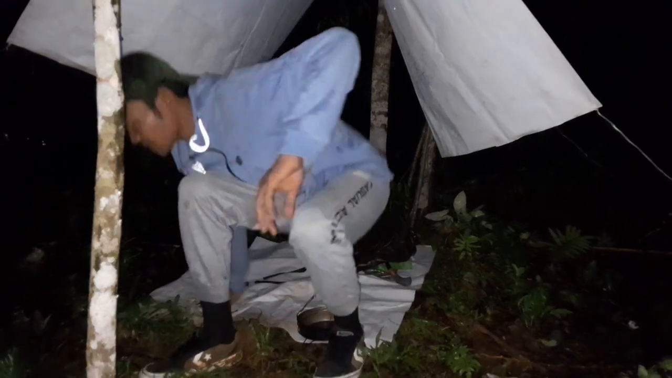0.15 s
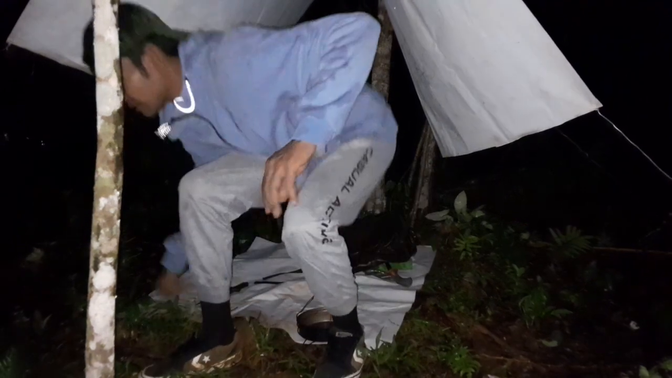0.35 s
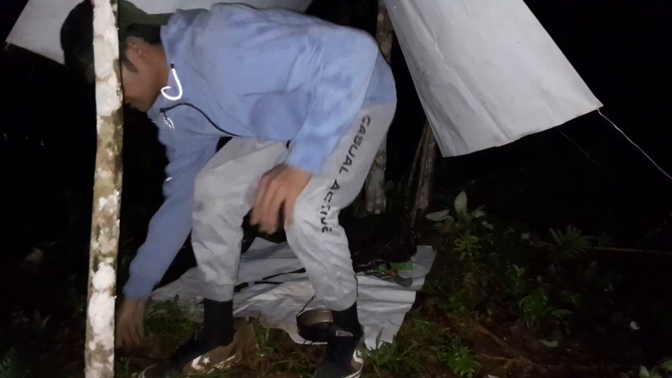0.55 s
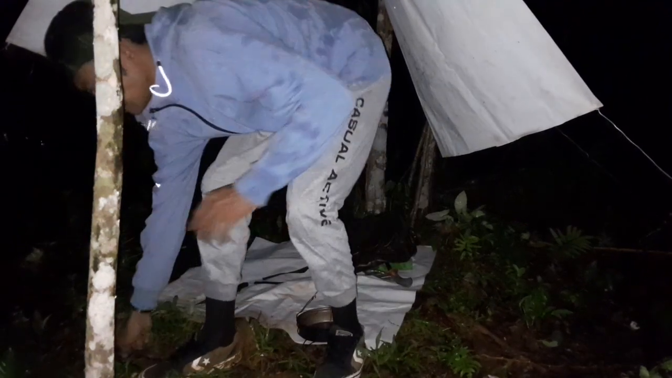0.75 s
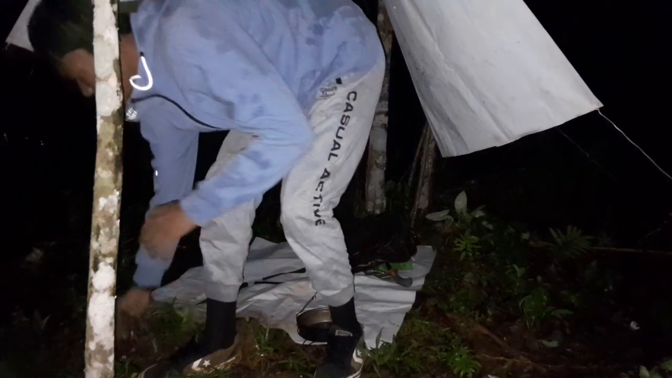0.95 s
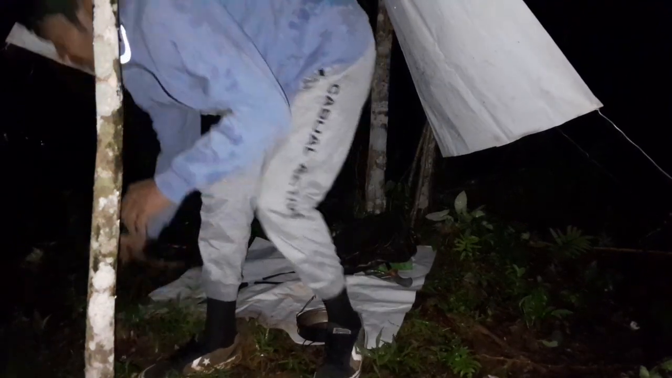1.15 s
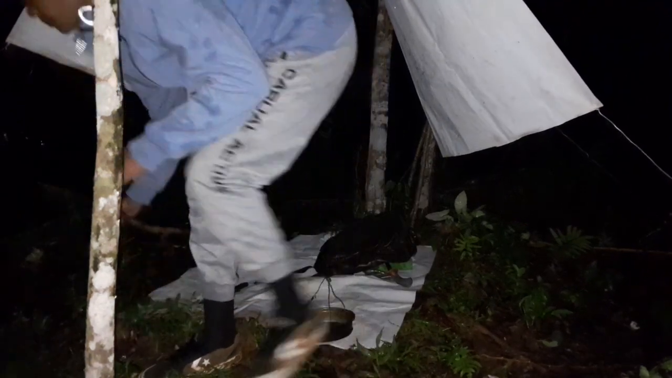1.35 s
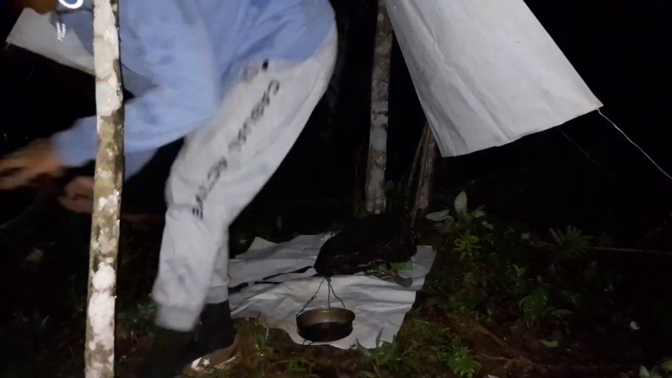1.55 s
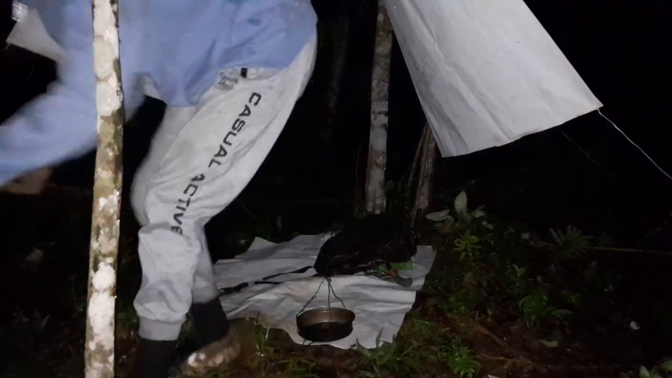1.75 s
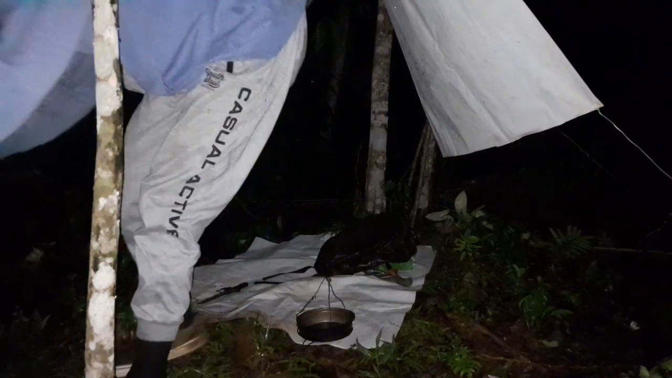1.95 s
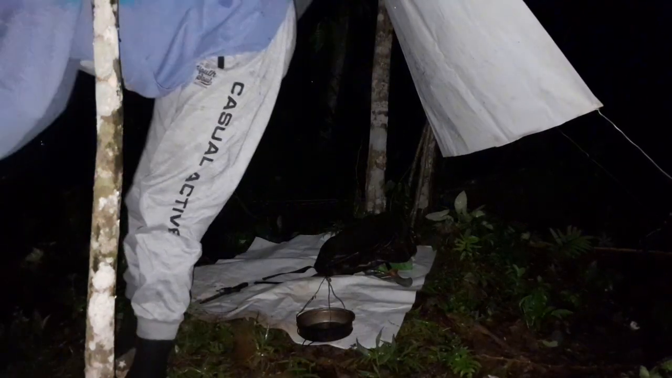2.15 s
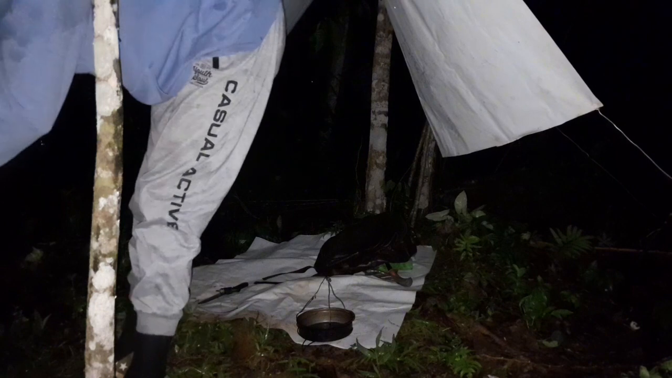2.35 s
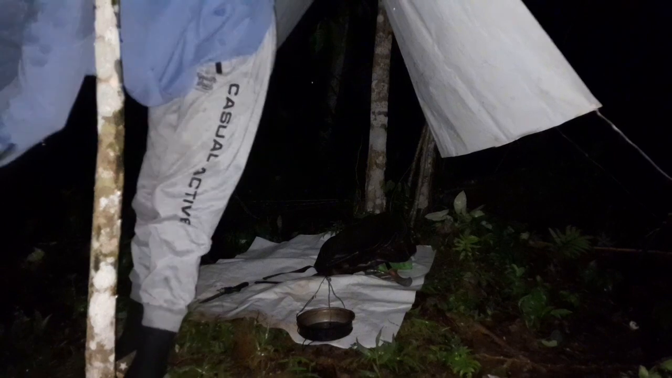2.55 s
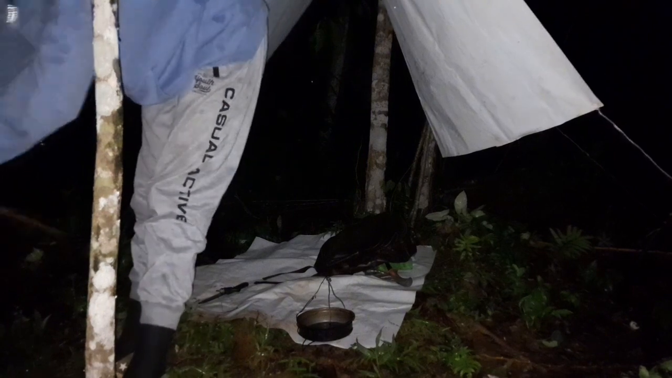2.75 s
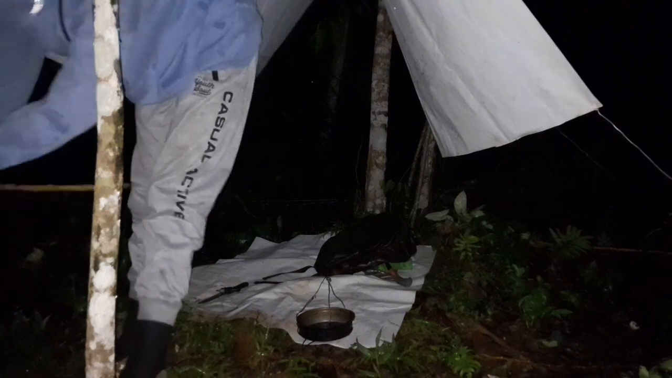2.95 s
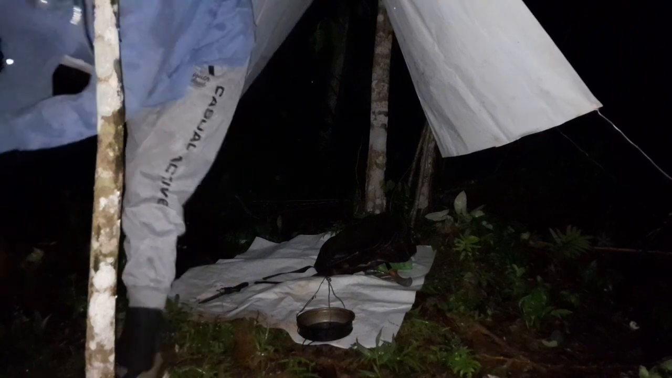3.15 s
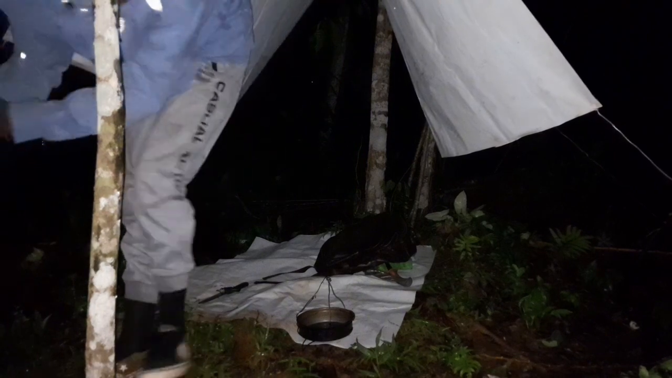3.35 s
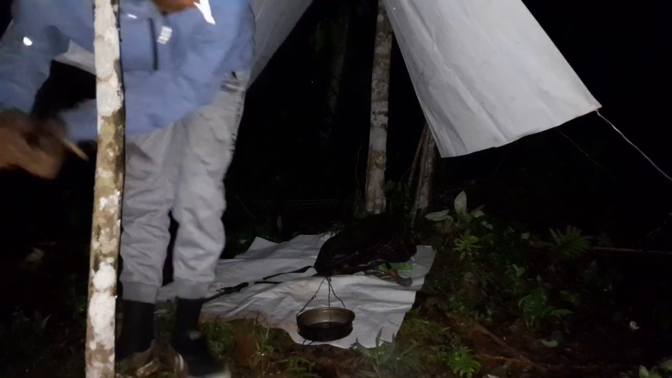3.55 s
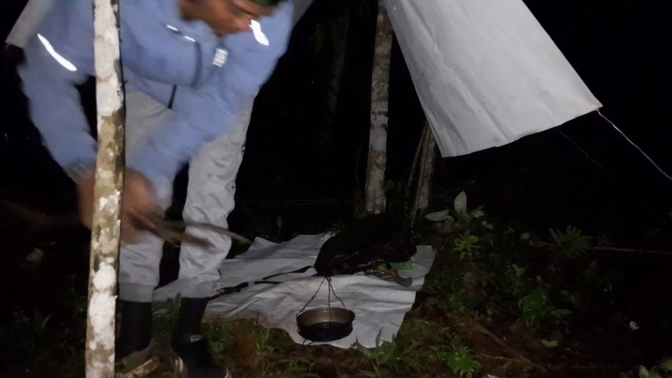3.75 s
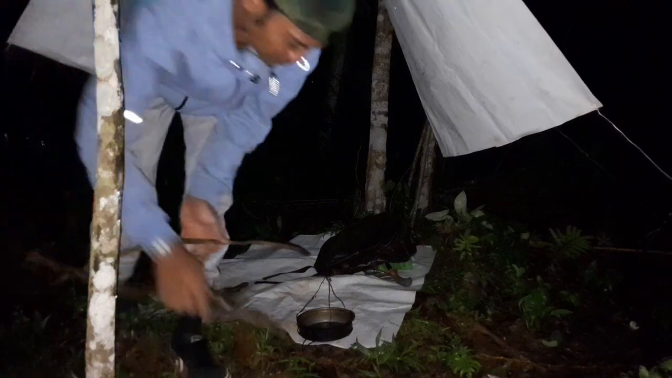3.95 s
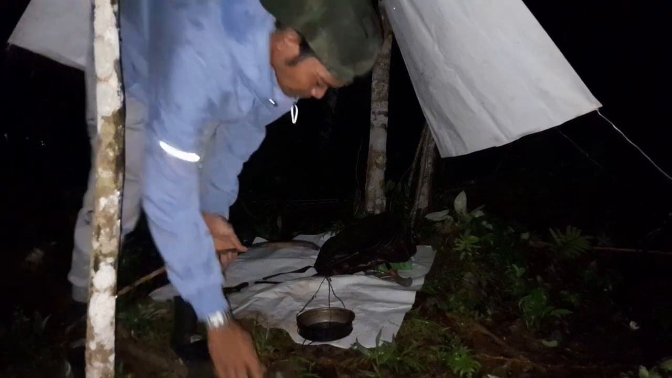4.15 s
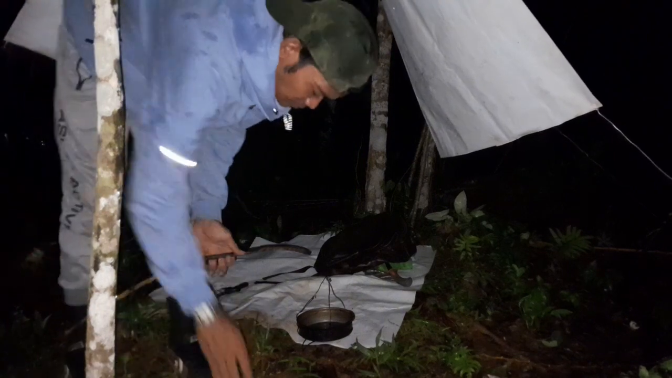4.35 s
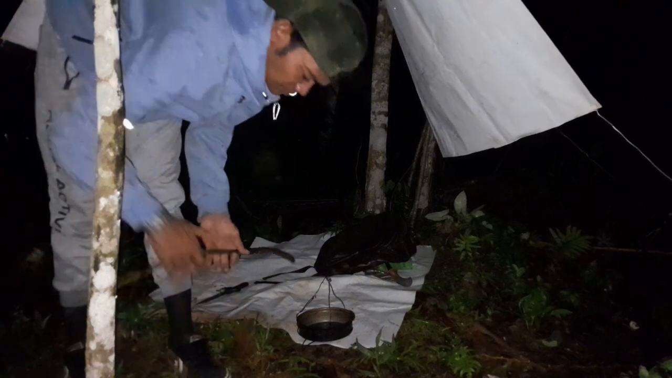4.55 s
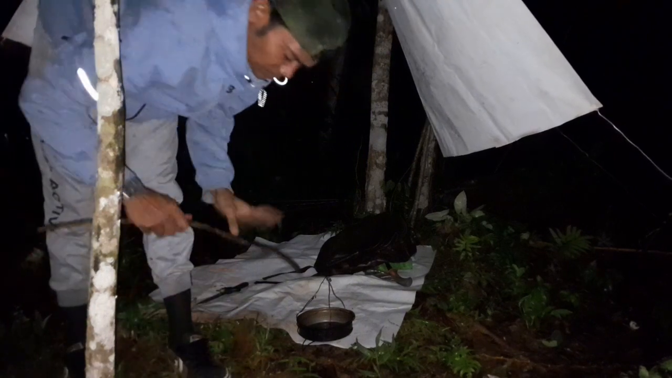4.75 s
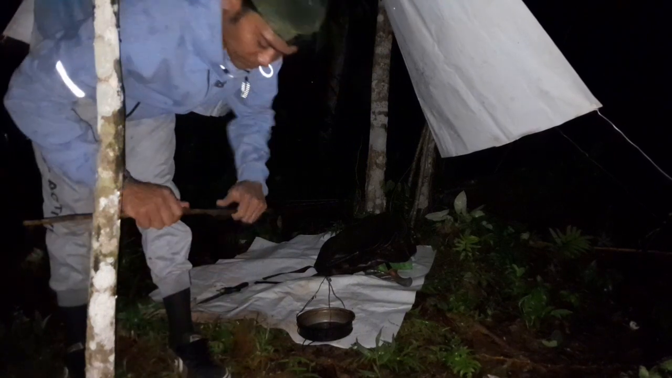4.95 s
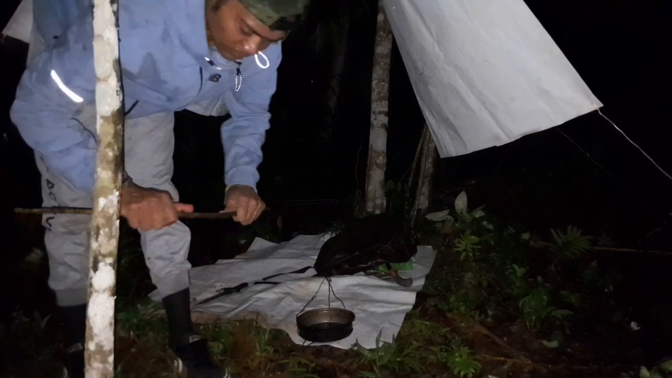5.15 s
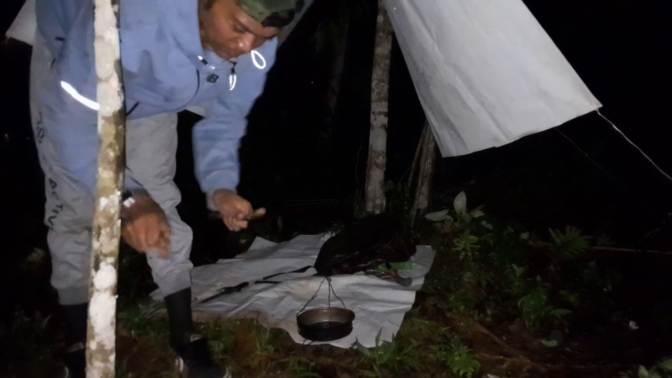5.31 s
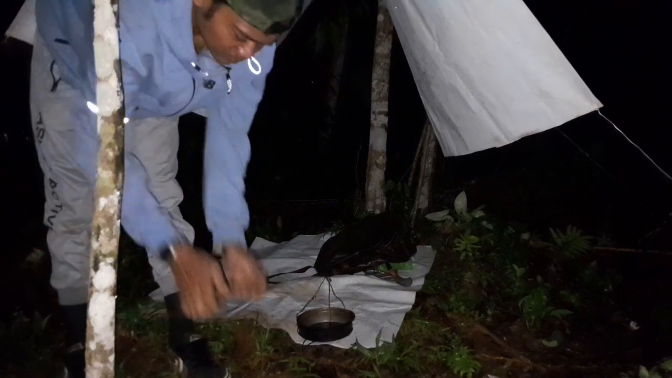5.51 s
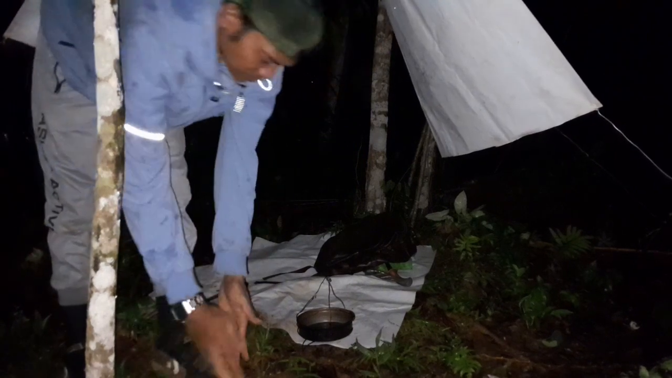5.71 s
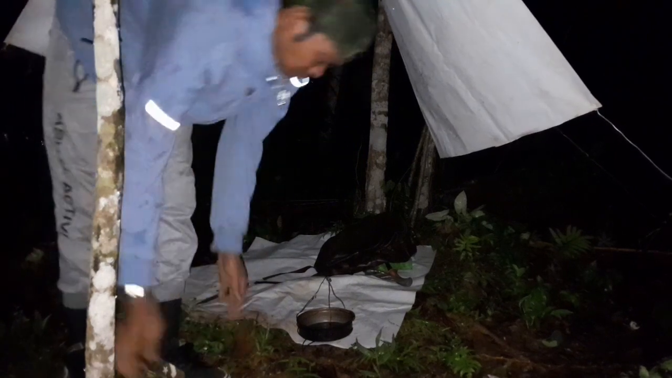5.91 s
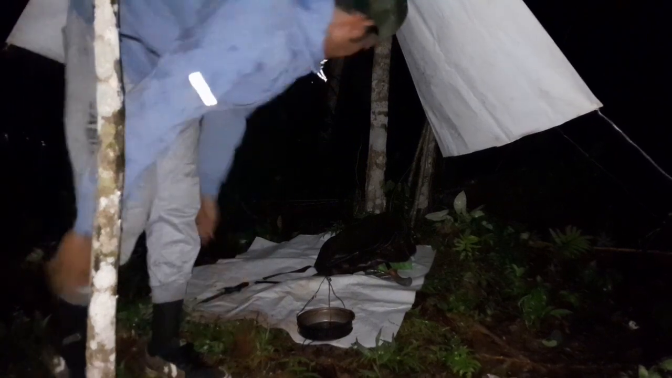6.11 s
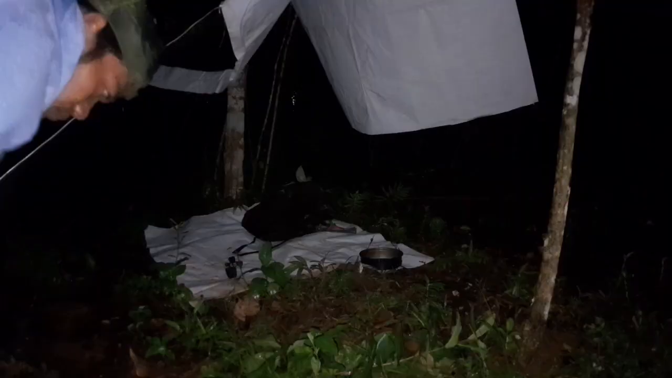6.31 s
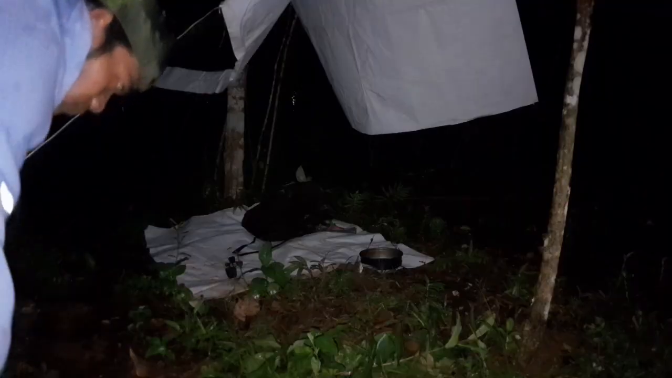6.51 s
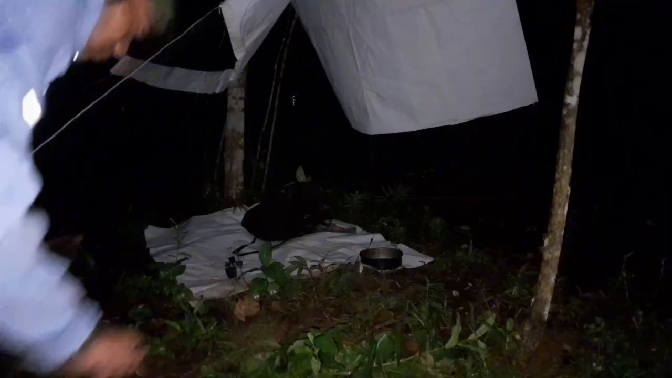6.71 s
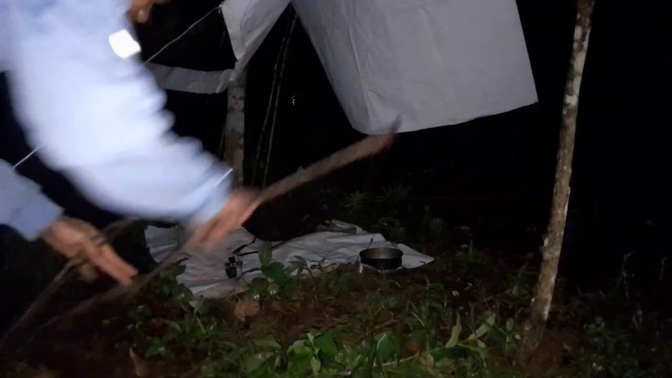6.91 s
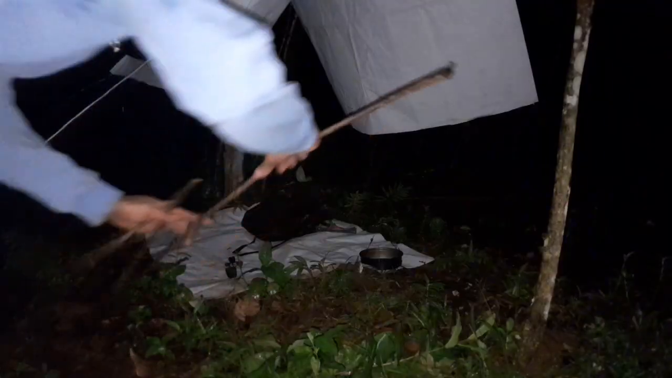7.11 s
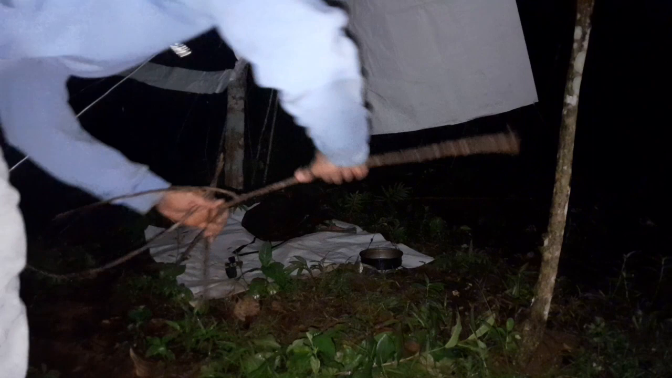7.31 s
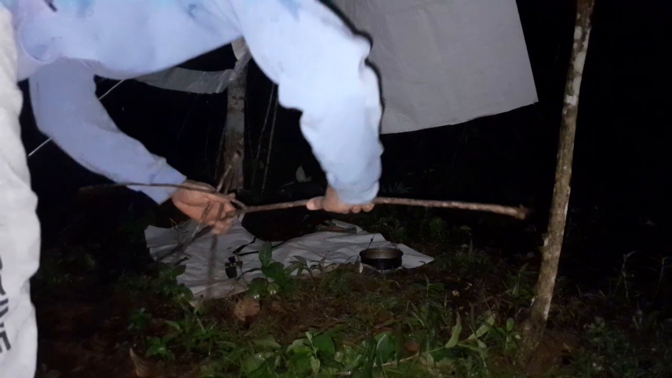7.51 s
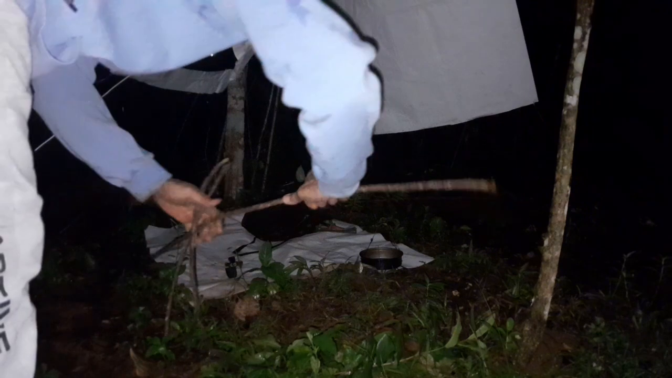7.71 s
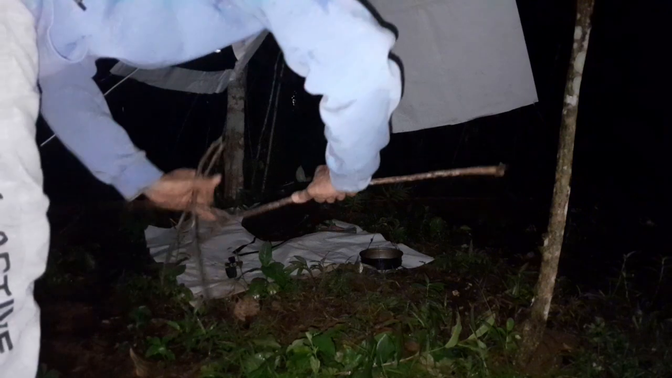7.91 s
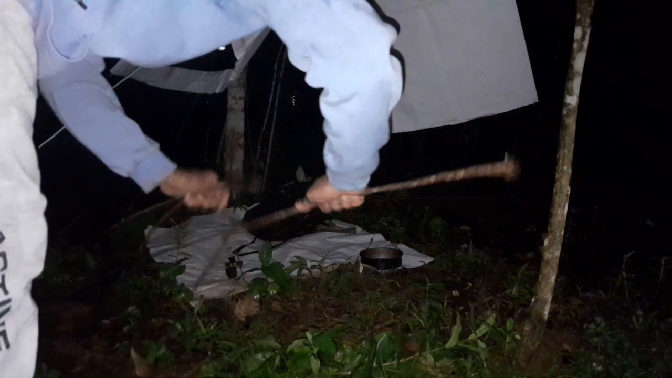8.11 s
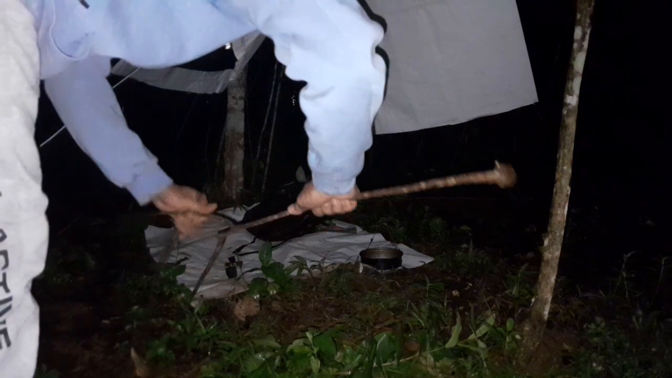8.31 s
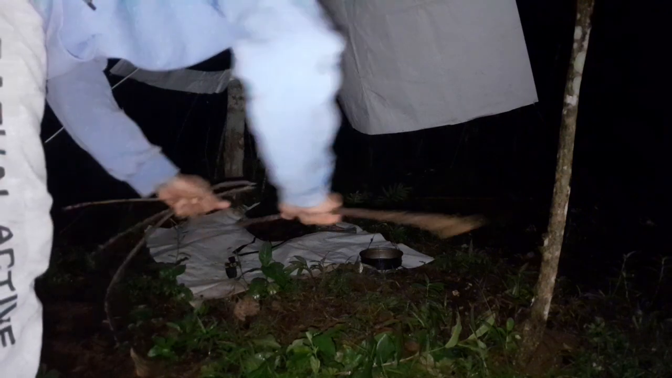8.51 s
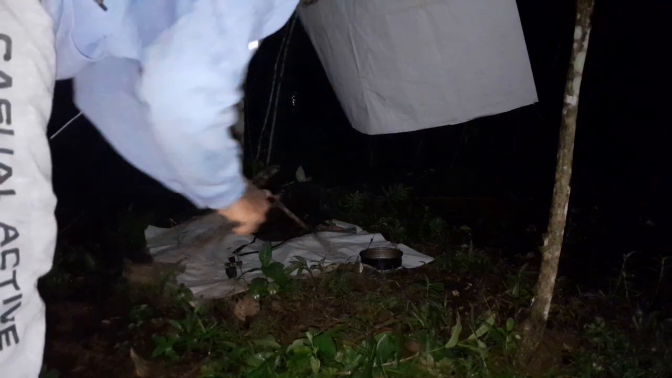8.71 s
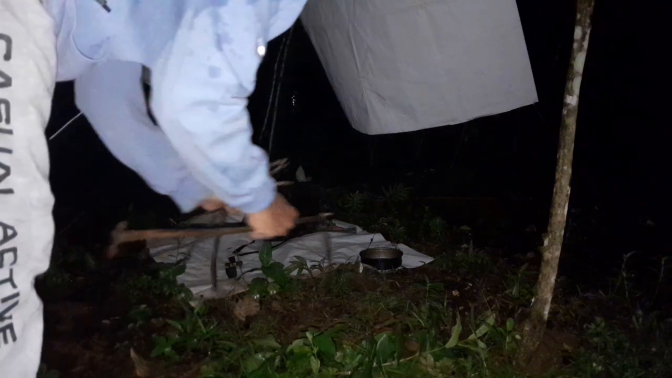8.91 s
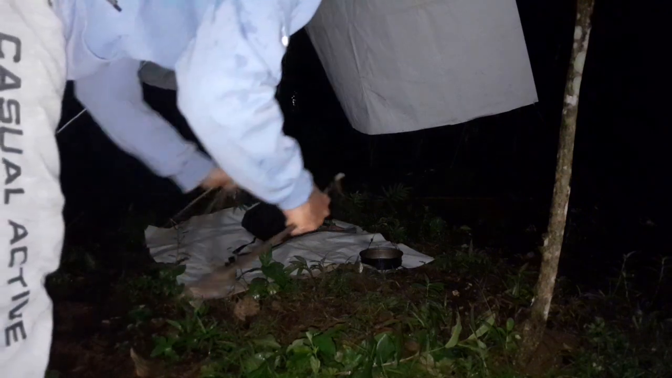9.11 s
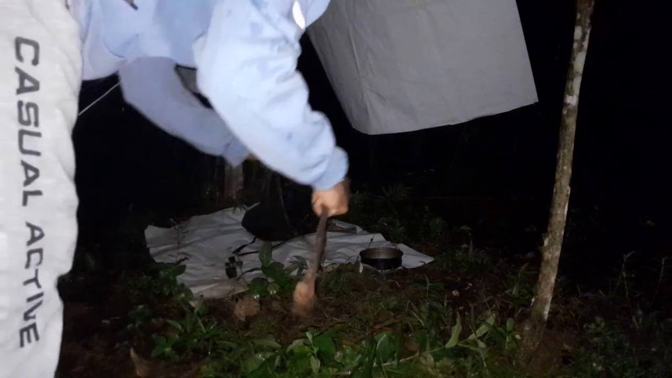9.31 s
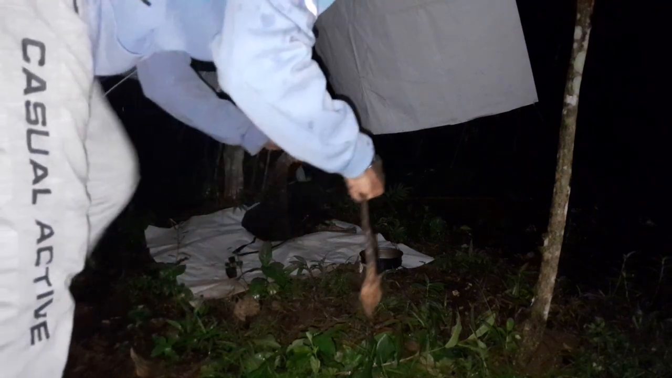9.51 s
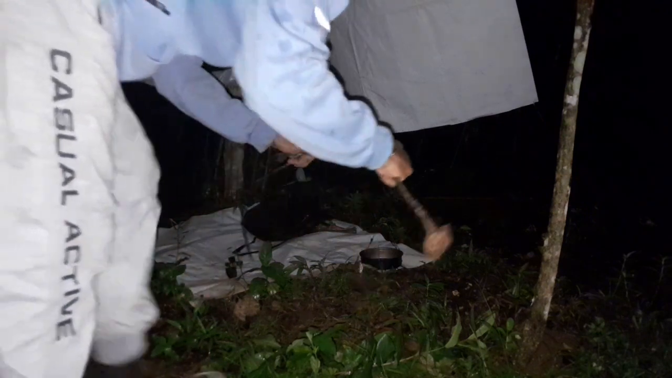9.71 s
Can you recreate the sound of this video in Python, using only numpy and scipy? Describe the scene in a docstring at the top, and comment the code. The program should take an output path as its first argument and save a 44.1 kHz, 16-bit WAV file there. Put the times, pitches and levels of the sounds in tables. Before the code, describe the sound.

Three dry sticks snap sharply at close range in a night forest, with rustling leaves and ticking twigs over a steady shrill insect chorus.

```python
"""Sticks snapped in a night forest

Someone gathers dry sticks at a camp and snaps three close by: sprays of tearing fibres over ringing modes.
Filtered click bursts make twigs and knocks, clumped noise makes leaves, and the trees scatter the cracks.
Insects sing as throbbing noise bands and swept sines; a far engine drones as sine orders until 6.35 s,
when the listening spot changes: the engine stops and the insects change in level."""
import sys
import numpy as np
from scipy import signal
from scipy.fft import rfft, irfft
from scipy.io import wavfile

SR = 44100
rng = np.random.default_rng(int(sys.argv[2]) if len(sys.argv) > 2 else 0)


def digitize_waveform(pressure):
    """Quantize a signal to 16-bit integers and store it at the path in sys.argv[1].

    Rows of a 2-D input are taken as channels; values are limited to [-1, 1].
    """
    field = np.atleast_2d(pressure).T
    bounded = np.clip(field, -1, 1)
    quanta = np.round(bounded * 32767).astype(np.int16)
    wavfile.write(sys.argv[1], SR, quanta)


N = 434826
T, HZ = np.arange(N) / SR, np.fft.rfftfreq(N, 1 / SR)
MOVE_S = 6.35  # the listening spot changes


def amp(db):
    """Decibels to gain."""
    return 10 ** (np.asarray(db) / 20)


def unit(x):
    """Scales to rms 1."""
    return x / np.sqrt(np.mean(x ** 2) + 1e-20)


def read(points, hz):
    """Reads a spectrum table on a log-frequency axis."""
    f, value = np.transpose(points)
    return np.interp(np.log(hz + 1), np.log(f + 1), value)


def curves(rows):
    """The columns of a time table at every sample."""
    s, *columns = np.transpose(rows)
    return [np.interp(T, s, column) for column in columns]


def add(mix, s, sound):
    """Lays a sound into the mix at s seconds."""
    part = mix[..., round(s * SR):][..., :sound.shape[-1]]
    part += sound[..., :part.shape[-1]]


def drift(hz):
    """Random wandering of rms 1: noise kept mostly below hz."""
    lowpass = np.exp(-np.minimum(HZ / hz, 20) ** 2)
    return unit(irfft(rfft(rng.standard_normal(N)) * lowpass, N))


def noise(gain, alike=.3, grain=1):
    """Stereo noise with a spectrum; alike is the likeness of the channels, grain roughens it."""
    a, b = rng.standard_normal((2, N)) * grain
    likeness = np.clip(alike, -1, 1)
    right = likeness * a + np.sqrt(1 - likeness ** 2) * b
    return unit(irfft(rfft([a, right]) * gain, N))


def ring(db, size=2048):
    """Causal (minimum-phase) impulse response of energy 1 with the given spectrum shape."""
    log_gain = np.log(amp(np.r_[db, db[-2:0:-1]]))
    spectrum = np.exp(np.conj(signal.hilbert(log_gain)))
    h = np.fft.ifft(spectrum).real[:size]
    return h / np.linalg.norm(h)


def burst(decay_s, size=6000):
    """A dying spray of tiny clicks in two channels, each of energy 1."""
    fade = np.exp(-np.arange(size) / SR / decay_s)
    x = rng.standard_normal((2, size)) * fade
    return x / np.linalg.norm(x, axis=1, keepdims=True)


def forest(x):
    """Trunks and leaves scatter the sound back; every band of the echo dies at its own pace."""
    # Time the scatter takes to fall by 60 dB. Each row: frequency in Hz, t60 in seconds.
    decay_times = [(200, 0.35), (1500, 0.47), (5000, 0.38), (10000, 0.32), (16000, 0.36)]
    taps = rng.standard_normal((2, SR)) * amp(1.4 * rng.standard_normal((2, SR)))
    hz, t, bands = signal.stft(taps, SR, nperseg=256)
    fade = amp(-60 * t / read(decay_times, hz)[:, None])
    tail = signal.istft(bands * fade, SR, nperseg=256)[1]
    tail /= np.linalg.norm(tail[0])
    return signal.fftconvolve(np.atleast_2d(x), tail, axes=1)[:, :N]


def moved():
    """0 at the first listening spot, 1 at the second, with a 21 ms crossing."""
    return np.clip((T - MOVE_S) / 0.021, 0, 1)


def night(rumble_db=1, air_db=-71, uneven_hz=820, uneven_db=-86):
    """Low distant rumble and the soft hiss of the forest, a little uneven in its middle band."""
    # Tone of the rumble. Each row: frequency in Hz, relative level in dB.
    rumble_tone = [(20, -26), (40, -20.5), (62, 6.5), (85, -5), (145, 2.5), (200, -6.5), (300, -12),
                   (450, -26.5), (900, -39)]
    # Swell of the rumble before its trim rumble_db. Each row: time in seconds, level in dB.
    rumble_swell = [(0, -57.5), (2.7, -60.5), (3.1, -66.5), (4.1, -66), (4.5, -64), (6.3, -61), (6.4, -67),
                    (9.86, -72)]
    # Tone of the forest hiss. Each row: frequency in Hz, relative level in dB.
    air_tone = [(50, 0), (300, -3), (600, -3), (950, -0.5), (1250, -6.5), (2600, -7.5), (5700, -5.5),
                (8300, -12), (12500, -9.5), (16000, -11.5)]
    swell_db, = curves(rumble_swell)
    rumble = noise(amp(read(rumble_tone, HZ)), alike=0.69) * amp(swell_db + rumble_db)
    air = noise(amp(read(air_tone, HZ)), alike=0.084) * amp(air_db + .9 * drift(4))
    middle_band = 1 / (1 + ((HZ - uneven_hz) / 90) ** 4)
    uneven = noise(middle_band, alike=.3) * amp(uneven_db + 4 * drift(14))
    return rumble + uneven + air


def engine(stop_s=.02):
    """A far engine note with weaker neighbouring orders, each wavering in level."""
    # The main order. Each row: time in seconds, pitch in Hz before a slight waver, relative level in dB.
    glide = [(0, 200, -57.5), (.7, 191.5, -59), (1.05, 177, -55), (1.35, 168, -68), (1.7, 147.9, -54.5),
             (2.1, 139.8, -58.5), (2.85, 128.7, -61), (3.2, 130.5, -76.5), (5.1, 174.9, -71.5),
             (5.6, 177, -64.5), (5.9, 174.8, -55.5), (6.32, 169.8, -58)]
    hz, db = curves(glide)
    phase = 2 * np.pi * np.cumsum(hz * (1 + .005 * drift(10))) / SR
    orders = [(5 / 6, -8), (1, 0), (7 / 6, -11), (8 / 6, -12)]  # (pitch ratio, level dB)
    drone = sum(np.sin(ratio * phase) * amp(order_db + 2 * drift(12)) for ratio, order_db in orders)
    heard = np.clip((MOVE_S - T) / stop_s, 0, 1)  # stops as the listening spot changes
    return heard * amp(db) * drone


def choirs(flutter_db=1.47, swell_share=0.65):
    """Many far insects of each kind blur into one narrow, throbbing band."""
    # One choir a row: centre in Hz, relative width, level in dB before the shared swell,
    # change in dB at the second listening spot, mean throbs a second, throb depth in dB (sign flips it).
    insect_bands = [(1542, 270, -81, 3, 3, 1), (2170, 420, -83.5, -8.5, 3.9, 5.5),
                    (3040, 71, -76, 5, 5.3, 3), (3196, 170, -76.5, 2, 3.8, 3.5),
                    (3540, 210, -75, 6.5, 5, -2), (4283, 250, -73.5, 2, 20, 2.5),
                    (4542, 240, -64, 1.5, 9, 1.5), (4903, 460, -68.5, 1, 3.5, 2),
                    (6276, 140, -69, -1, 11, 2), (6710, 520, -69.5, 2.5, 2.2, 3.5),
                    (7390, 680, -77.5, 1.5, 3, 2), (9250, 910, -85.5, 8.5, 3.3, 3.5)]
    # Shared swell, used about its median and scaled by swell_share. Each row: time in seconds, level in dB.
    shared_swell = [(0.0, -60.5), (2.97, -60), (3.29, -66.5), (3.87, -64.5), (4.2, -56.5), (4.72, -63),
                    (5.32, -60.5), (9.86, -66)]
    out, second = np.zeros((2, N)), moved()
    for hz, width, db, change_db, rate, depth_db in insect_bands:
        throb = np.sin(2 * np.pi * np.cumsum(rate * (1 + 0.2014 * drift(2.12))) / SR)
        band = 1 / (1 + ((HZ - hz) / (0.91 * width)) ** 2) ** 2
        level_db = db + change_db * second + depth_db * throb + flutter_db * drift(46)
        out += noise(band, alike=0.017) * amp(level_db)
    swell_db, = curves(shared_swell)
    return out * amp(swell_share * (swell_db - np.median(swell_db)))


def bouts(rise_s=0.17, fall_s=.14, tire_db_per_s=0.5, slowing_s=.3, slowing=.4):
    """Loudness and chirp rate of the loudest insect: each bout swells, tires, slows and stops."""
    # One bout a row: start in seconds, end in seconds, mid-bout level in dB before the mix,
    # chirps a second before the slowing at its end.
    song = [(-.3, 1.87, -59, 20.6), (2.25, 3.2, -59.5, 15.4), (3.9, 4.92, -59, 20.8),
            (5.13, 7.18, -60.5, 19), (7.47, 9.44, -61.5, 22.4)]
    gain, rate = np.zeros((2, N))
    for start, end, db, chirps in song:
        gate = np.clip(np.minimum((T - start) / rise_s, (end - T) / fall_s), 0, 1)
        gain += gate * amp(db - tire_db_per_s * (T - (start + end) / 2))
        ending = np.clip(1 - (end - T) / slowing_s, 0, 1)
        rate += (gate > 0) * chirps * (1 - slowing * ending)
    return gain, rate


def singer(hz=3740, sweep_hz=390, narrowing=0.43, rasp_hz=40, direct_db=-6, wet_db=-7, buzz_db=-3.0,
           uneven=.06, overtone_db=-9.5, overtone_change_db=-6.5):
    """Falling chirps that slow as each bout ends, over a dense buzz in the same band."""
    gain, rate = bouts()
    second = moved()
    duty = .55  # sounding share of each chirp period
    cycle = np.cumsum(rate * (1 + uneven * drift(6))) / SR % 1
    along = np.minimum(cycle / duty, 1)  # 0 to 1 through a chirp
    sweep = sweep_hz * (1 - narrowing * second) * (.5 - along)
    pitch = hz + sweep + rasp_hz * drift(402)
    phase = 2 * np.pi * np.cumsum(pitch) / SR
    level = gain * unit(np.abs(np.sin(np.pi * along)) ** 0.49) * np.sqrt(2)
    ears = np.array([phase, phase + 1.59])  # about a quarter cycle between the channels
    note = level * np.sin(ears)
    overtone = level * amp(overtone_db + overtone_change_db * second) * np.sin(3 * ears)  # third harmonic
    band = 1 / (1 + np.abs((HZ - hz) / (0.67 * sweep_hz)) ** 7)
    buzz = noise(band, alike=.1) * gain * amp(buzz_db)
    clearer = amp(3 * second)  # more note and less buzz at the second spot
    direct = buzz / clearer + clearer * amp(direct_db) * note + 0.57 * overtone
    return direct + amp(wet_db) * forest(note[0]) + .5 * forest(overtone[0])


def tap(db, centre_hz, decay_s, skirt_db):
    """A short burst through one broad resonance whose skirts fall by skirt_db an octave."""
    octaves = np.log2(np.fft.rfftfreq(4096, 1 / SR) / centre_hz + 1e-3)
    skirts = -skirt_db * (np.hypot(.5, octaves) - .5)  # rounded at the centre
    body = ring(np.maximum(skirts, -90))
    x = signal.fftconvolve(burst(decay_s), body[None], axes=1)
    return amp(db) * x / np.linalg.norm(x, axis=1, keepdims=True)


def rustle(scuff_db=0, crackle_db=-1):
    """Clumps of tiny clicks swell and fade under each step and reach; single dry stalks snap among them."""
    # Steps and reaches in the leaf litter. Each row: peak time in seconds, seconds from the peak
    # to 9 dB down, low scuffing in dB, crisp crackle in dB (both before the trims above).
    steps = [(1.308, 0.073, -62.5, -53.5), (1.564, 0.045, -58, -50.5), (1.609, 0.038, -53, -49.5),
             (3.23, 0.078, -78, -65), (3.593, 0.02, -71.5, -64.5), (4.293, 0.073, -81, -59.5),
             (4.458, 0.048, -80, -57), (5.774, .12, -82, -60.5), (6.146, 0.034, -61.5, -64),
             (6.614, 0.1, -60, -55), (6.812, 0.16, -61.5, -60.5), (7.105, 0.053, -53, -56.5),
             (7.278, 0.038, -59.5, -66), (7.68, 0.12, -66, -66.5), (9.852, 0.049, -60, -61)]
    # Tone of the low scuffing. Each row: frequency in Hz, relative level in dB.
    scuff_tone = [(100, -35), (350, -7), (900, -1.5), (2000, -7), (5000, -9), (9000, -21), (15000, -45)]
    # Tone of the crisp leaves. Each row: frequency in Hz, relative level in dB.
    crackle_tone = [(500, 0.5), (2500, 0), (6000, 3), (9000, -10), (13000, 0.5), (16000, -3.5)]
    clumps = amp(3.5 * drift(140) + 1.8 * drift(30))
    crisp = amp(read(crackle_tone, HZ))
    scuff = noise(amp(read(scuff_tone, HZ)), alike=0.17, grain=clumps)
    leaves = noise(crisp, alike=0.13, grain=clumps)
    stalks = noise(crisp, alike=.5, grain=rng.random(N) < 220 / SR)  # about 220 clicks a second
    crackle = .87 * leaves + .5 * stalks
    low_power, high_power = np.zeros((2, N))
    for s, length, low_db, high_db in steps:
        swell = 1 / (1 + ((T - s) / length) ** 2) ** 3
        low_power += swell * amp(low_db + scuff_db) ** 2
        high_power += swell * amp(high_db + crackle_db) ** 2
    return scuff * np.sqrt(low_power) + crackle * np.sqrt(high_power)


def handling(forest_db=-6, twig_skirt_db=11, tick_s=0.0013, ticks_per_s=1.1, tick_db=-40.5,
             tick_spread_db=3, tick_hz=8600):
    """Twigs tick, feet and sticks knock, leaf litter rustles; the forest scatters the ticks and knocks."""
    # Small twigs and splinters. Each row: start in seconds, level in dB, centre in Hz, decay in seconds.
    twigs = [(1.308, -26, 4870, .002), (1.5574, -28, 10000, .0015), (4.2404, -27.5, 6500, .0012),
             (4.879, -22, 4600, 0.0029), (6.8334, -31.5, 10030, .0012), (7.102, -24.5, 4600, .003),
             (7.411, -34, 10090, .001), (8.547, -29.5, 8060, .003), (8.5698, -18, 6500, 0.0034)]
    # Dull knocks of feet and wood on the ground. Each row: start in seconds, level in dB before
    # the channel blend, centre in Hz, decay in seconds, skirt in dB per octave.
    knocks = [(.069, -33.5, 586, .012, 13), (1.608, -21.5, 367, 0.012, 14), (2.662, -17, 110, .01, 12.5),
              (4.29, -15, 135, .01, 16), (4.292, -25, 446, 0.0082, 26), (4.876, -21.5, 2100, 0.0073, 25),
              (5.234, -22.5, 70, 0.021, 11), (5.703, -32.5, 1199, .012, 18), (5.818, -31.5, 929, .02, 15),
              (6.131, -21.5, 420, 0.0097, 16.5), (6.142, -29, 892, .006, 15), (7.082, -23.5, 403, .021, 16),
              (7.631, -28.5, 383, 0.018, 10), (8.634, -19.5, 75, 0.063, 14.5)]
    out = np.zeros((2, N))
    for s, db, hz, decay_s in twigs:
        add(out, s, tap(db, hz, decay_s, twig_skirt_db))
    # fainter ticks fall at random
    for at in np.flatnonzero(rng.random(N) < ticks_per_s / SR):
        db = tick_db + tick_spread_db * rng.standard_normal()
        add(out, at / SR, tap(db, tick_hz, tick_s, twig_skirt_db))
    for s, db, hz, decay_s, skirt_db in knocks:
        knock = tap(db, hz, decay_s, skirt_db)
        add(out, s, 0.67 * knock + 0.37 * knock[::-1])  # blended towards the middle
    return out + amp(forest_db) * forest(out) + rustle()


def rasper(hz=5020, width_hz=240):
    """Soft rasping insect calls in even runs, each swelling and fading in one band of noise."""
    # One run a row: first call in seconds, last call in seconds, calls a second, peak gain in dB.
    call_runs = [(.3, 2.33, 3.94, -67), (4.2, 4.5, 4, -69), (5.68, 6.895, 4.2, -62), (7.22, 8.2, 4, -61.5)]
    gain = np.zeros(N)
    for first, last, rate, db in call_runs:
        calling = (T > first - .5 / rate) & (T < last + .5 / rate)
        gain += calling * amp(db) * np.cos(np.pi * rate * (T - first)) ** 2
    band = 1 / (1 + ((HZ - hz) / width_hz) ** 4)
    return gain * noise(band, alike=.05)


def snaps(tear_s=0.0006, ground_s=0.017, ground_db=-6, forest_db=-6, db=-1.5):
    """Each stick fails in quick sprays of tearing fibres and rings; ground and trees scatter the crack."""
    # Fibres giving way, one table a stick. Each row: start in seconds, relative level in dB,
    # left-minus-right level in dB before the shared pan.
    breaks = [
        [(2.6615, -9, -2), (2.6624, 9, 5.5), (2.6645, 6, 6.5)],
        [(5.2328, -3.5, 10), (5.2335, 2, -2), (5.2364, 0, -2)],
        [(8.6322, -3, -16), (8.6333, 0, 19), (8.635, -3, -6), (8.6357, 1.5, -14.5)],
    ]
    # Colour of the crack, one table a stick. Each row: frequency in Hz, relative level in dB.
    wood_colours = [
        [(150, -22), (400, -31), (750, -27), (1500, -15), (1950, -13.5), (2900, -13), (3400, -6.5), (4900, -1),
         (5600, -8.5), (7000, -6), (9200, -16), (11200, -6), (15500, -6)],
        [(150, -53), (400, -31), (700, -17.5), (1250, -24), (2360, -11.5), (3000, -7), (5200, 1.5),
         (7700, -3.5), (8900, -9), (12200, 0), (15500, -3)],
        [(150, -40.5), (700, -22), (1150, -24), (1850, -17), (2150, -13), (2800, -11), (3700, -7), (5100, 0),
         (7000, -4.5), (9400, -9.5), (12000, -3.5), (15500, -3.5)],
    ]
    # What each stick rings with, one table a stick. Each row: pitch in Hz, relative level in dB, t60 in seconds.
    stick_modes = [
        [(1610, -29, 0.059), (3375, -13.5, .02)],
        [(1515, -22, 0.019), (7850, -7.5, 0.03)],
        [(2210, -14.5, 0.04), (7050, 0, 0.023)],
    ]
    # Shared pan of all cracks. Each row: frequency in Hz, left-minus-right level in dB.
    shared_pan = [(1000, -3), (6000, -5), (8000, -3.5), (10000, -11), (15000, -3)]
    # Tone sent into the trees. Each row: frequency in Hz, relative level in dB.
    forest_tone = [(200, 6), (1500, 4.5), (4000, 0), (9000, 5.5), (16000, -1.5)]
    direct, outward = np.zeros((2, N)), np.zeros(N)
    hz, t = np.fft.rfftfreq(4096, 1 / SR), np.arange(6000) / SR
    five_samples_late = np.exp(-2j * np.pi * np.fft.rfftfreq(len(t)) * 5)
    for fractures, colour, modes in zip(breaks, wood_colours, stick_modes):
        wood = ring(read(colour, hz))
        for s, level_db, pan_db in fractures:
            fibres = rfft(burst(tear_s))
            fibres /= np.abs(fibres) ** .7  # evens out the spectrum
            fibres[1] += 1.2 * fibres[0] * five_samples_late  # the left crack also reaches the right
            crack = signal.fftconvolve(irfft(fibres), wood[None], axes=1)[:, :3000]
            crack /= np.linalg.norm(crack, axis=1, keepdims=True)
            add(direct, s, crack * amp([[level_db + pan_db / 2], [level_db - pan_db / 2]]))
        main_s = fractures[1][0]
        # the whole energy of the break also spreads outward into the forest
        strength = np.linalg.norm(amp(np.array(fractures)[:, 1]))
        add(outward, main_s, strength * wood)
        for mode_hz, level_db, t60 in modes:
            note = np.sin(2 * np.pi * mode_hz * t) * amp(-60 * t / t60)
            add(direct, main_s, amp(level_db) * note / np.linalg.norm(note))
    pan_db = read(shared_pan, HZ)
    direct = irfft(rfft(direct) * amp([pan_db / 2, -pan_db / 2]), N)
    ground = signal.oaconvolve(outward[None], burst(ground_s), axes=1)[:, :N]
    scattered = forest(irfft(rfft(outward) * amp(read(forest_tone, HZ)), N))
    return amp(db) * (direct + amp(ground_db) * ground + amp(forest_db) * scattered)


def cricket(hz=6540, rise_hz=380, db=-60.0, wet_db=-11, third_pulse=.6):
    """Each wing stroke is a short rising note; two or three make a chirp, and chirps come in near-even runs."""
    # One run a row: first chirp in seconds, last chirp in seconds (both before jitter), number of chirps.
    chirp_runs = [(6.36, 6.56, 3), (6.776, 7.935, 13), (8.012, 8.893, 10), (9.003, 9.783, 9)]
    pulse_s, period_s, jitter_s = .018, .0225, .003
    out, along = np.zeros(N), np.linspace(0, 1, int(pulse_s * SR))
    for first, last, count in chirp_runs:
        for s in np.linspace(first, last, count) + jitter_s * rng.standard_normal(count):
            pulses = 2 + (rng.random() < third_pulse)  # third_pulse is the chance of a third stroke
            for k in range(pulses):
                pitch = hz + rise_hz * (along - .5) + 25 * rng.standard_normal()
                note = np.sin(np.pi * along) * np.sin(2 * np.pi * np.cumsum(pitch) / SR)
                add(out, s + k * period_s - pulse_s / 2, amp(db + rng.standard_normal()) * note)
    return out + amp(wet_db) * forest(out)


def scene():
    """Sticks and footsteps in front, insects and engine behind."""
    background = night() + engine()
    insects = choirs() + singer() + rasper() + cricket()
    return background + insects + handling() + snaps()


def record(dry):
    """The recorder's band limit: a steep low-pass at 15.9 kHz."""
    lowpass = signal.firwin(511, 15900, window=("kaiser", 9), fs=SR)
    return signal.oaconvolve(dry, lowpass[None], "same")


dry = scene()
out = record(dry)
digitize_waveform(out)
```